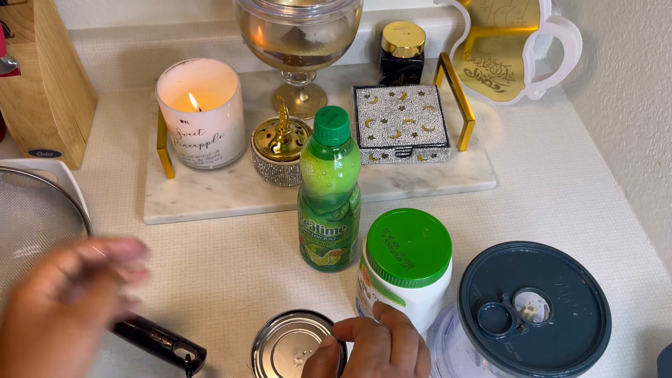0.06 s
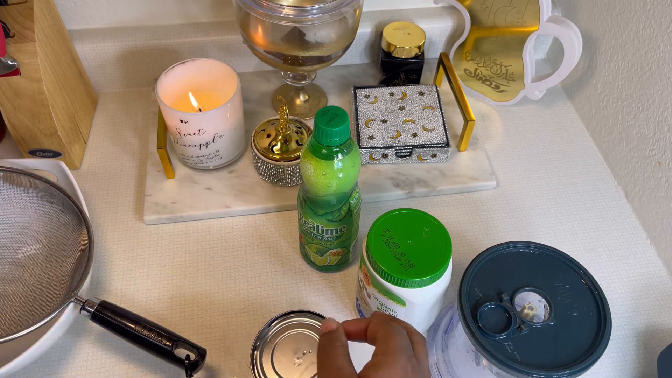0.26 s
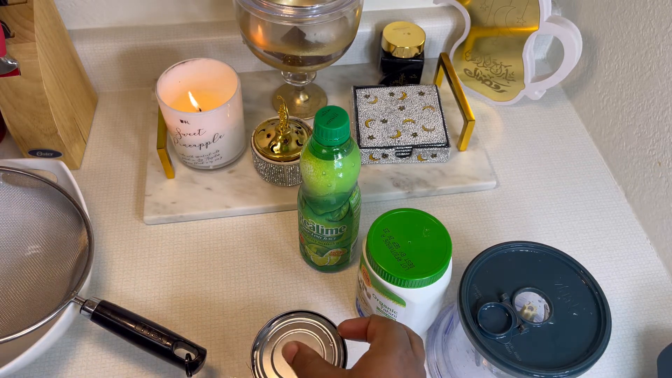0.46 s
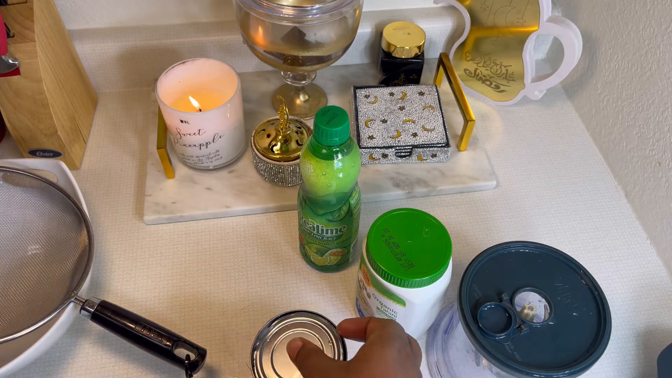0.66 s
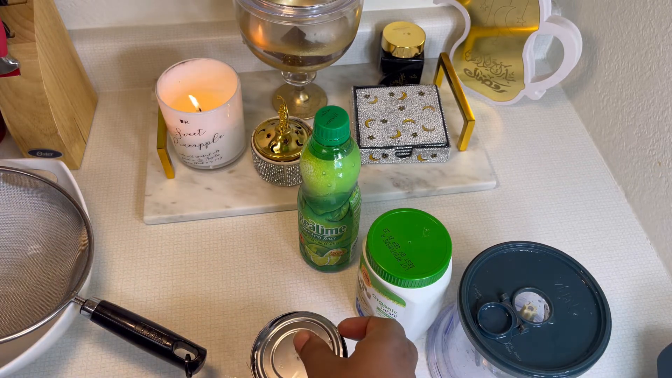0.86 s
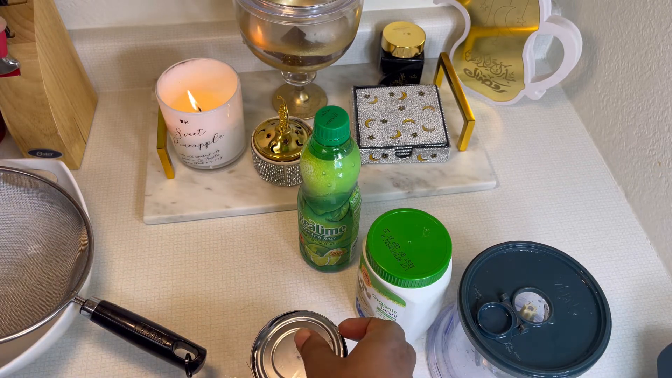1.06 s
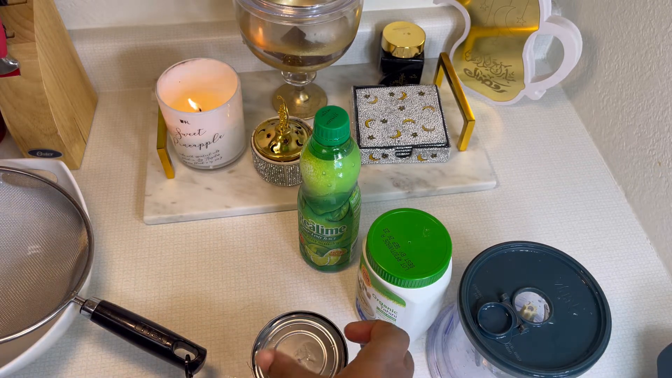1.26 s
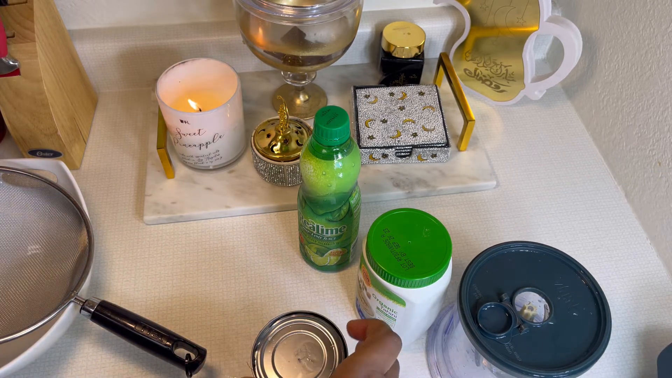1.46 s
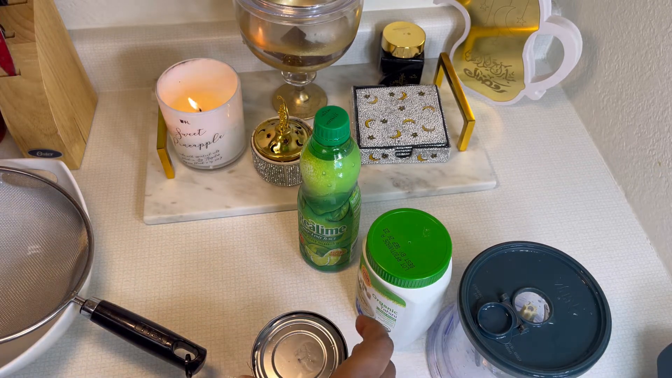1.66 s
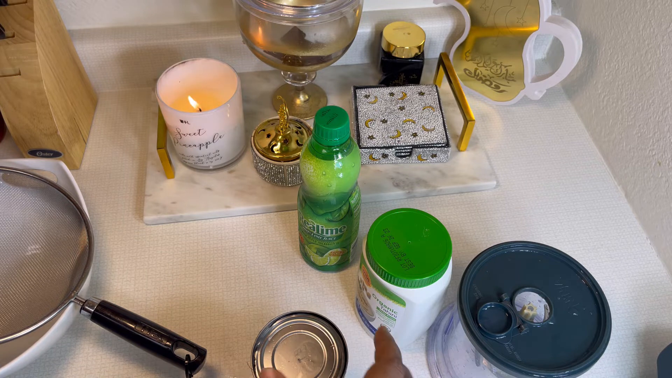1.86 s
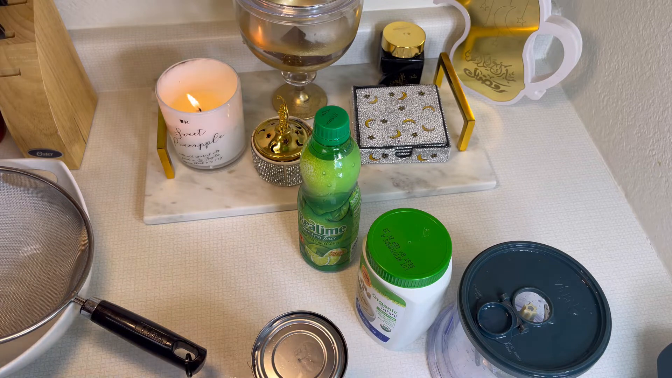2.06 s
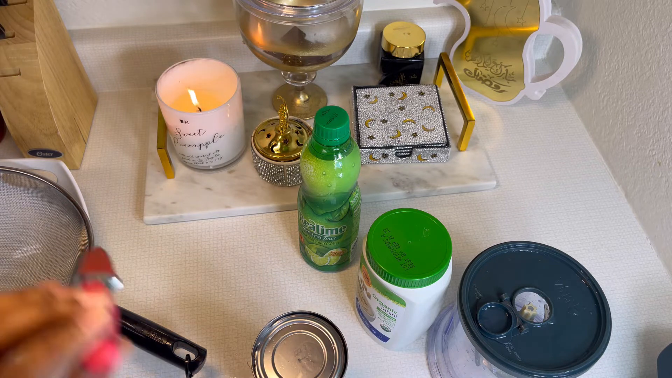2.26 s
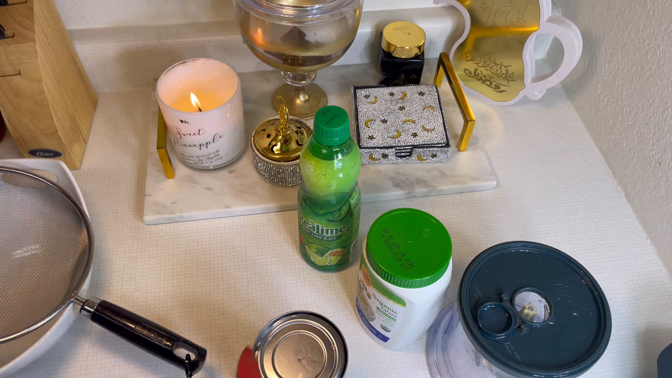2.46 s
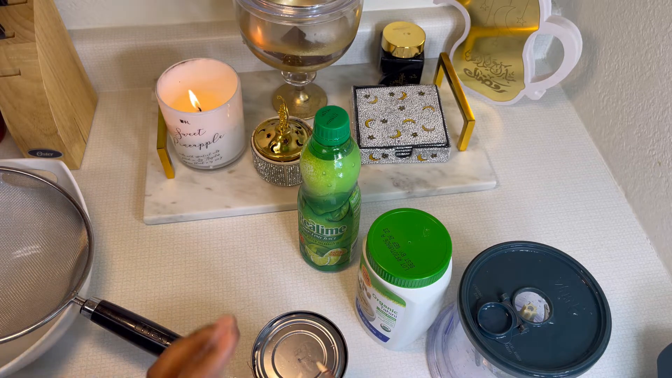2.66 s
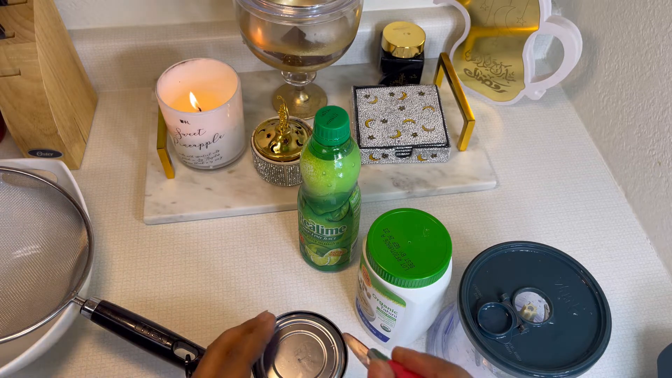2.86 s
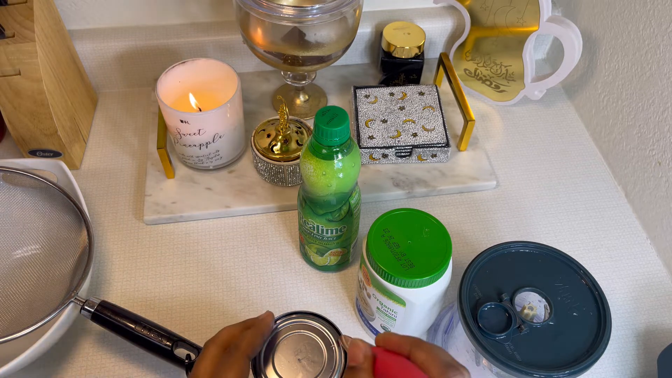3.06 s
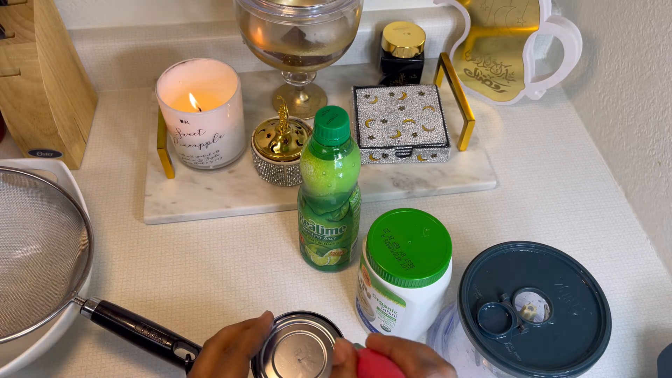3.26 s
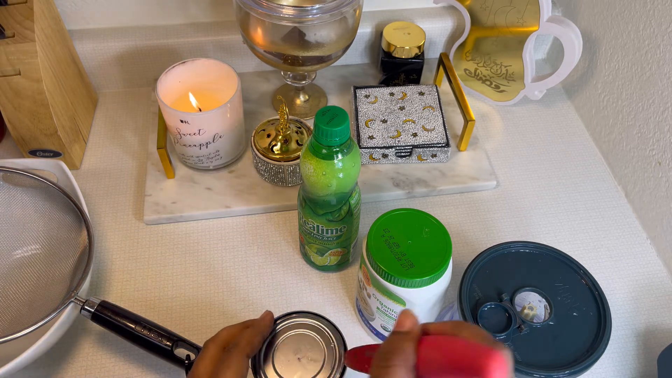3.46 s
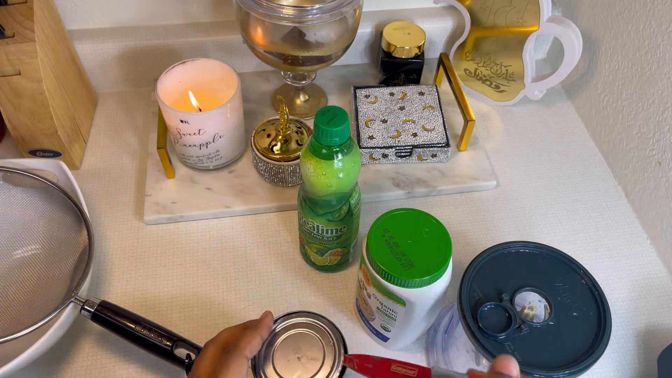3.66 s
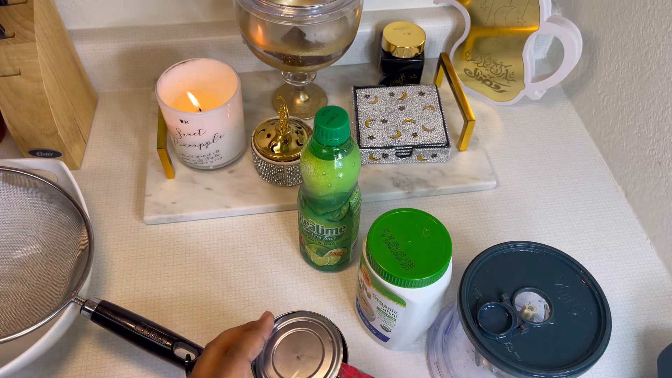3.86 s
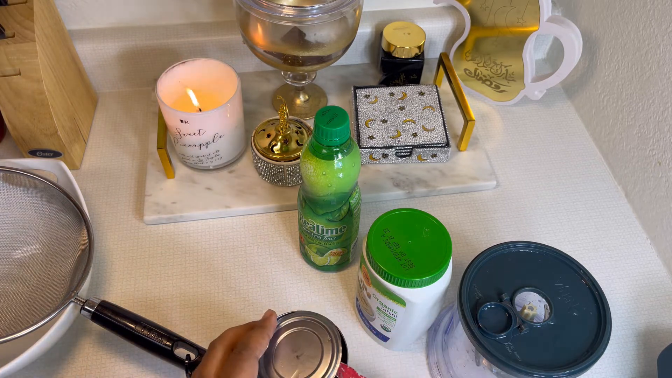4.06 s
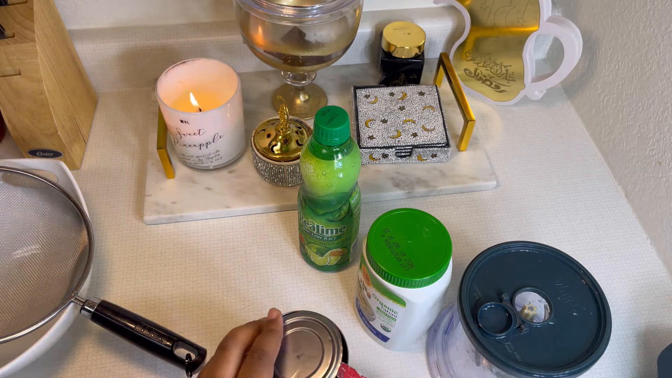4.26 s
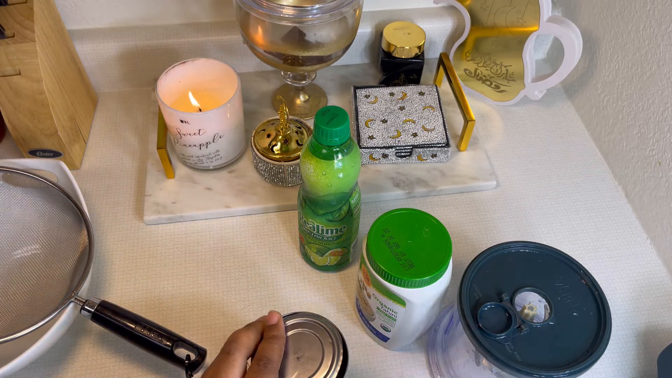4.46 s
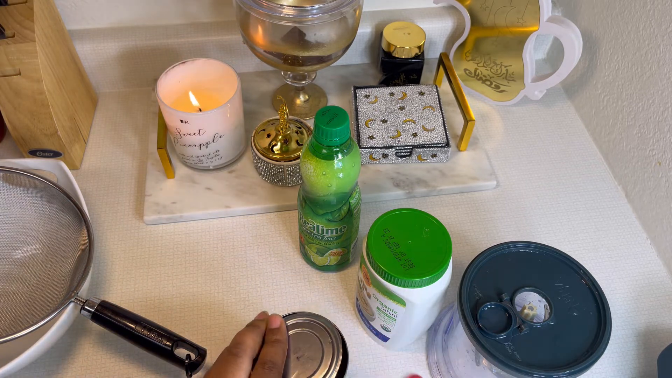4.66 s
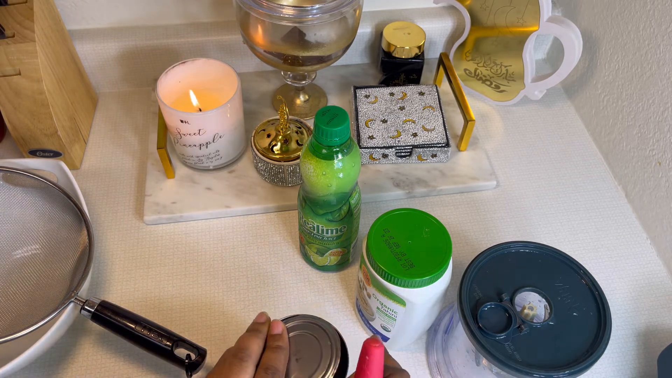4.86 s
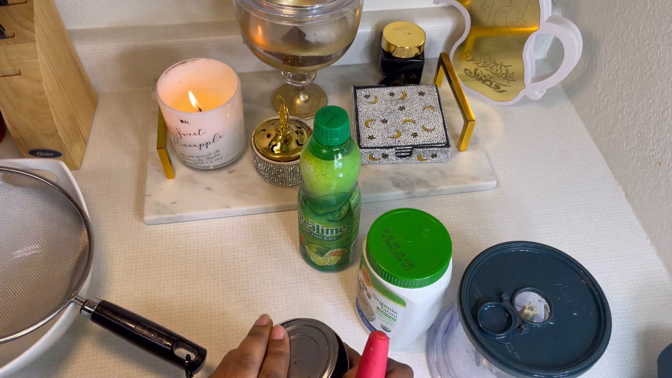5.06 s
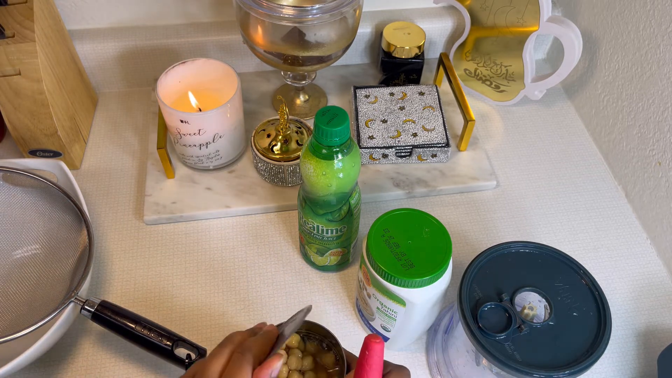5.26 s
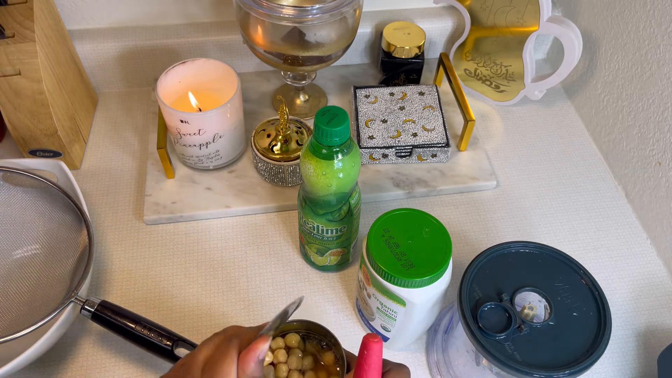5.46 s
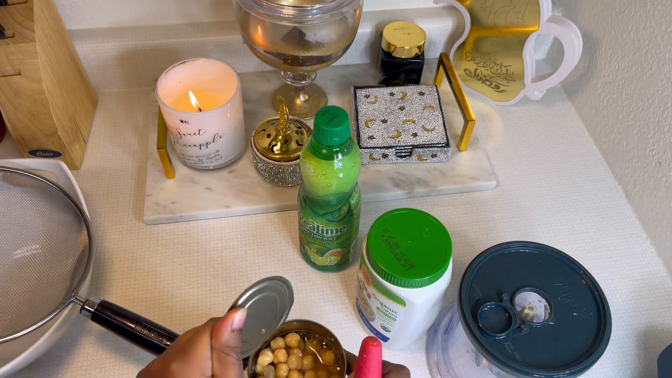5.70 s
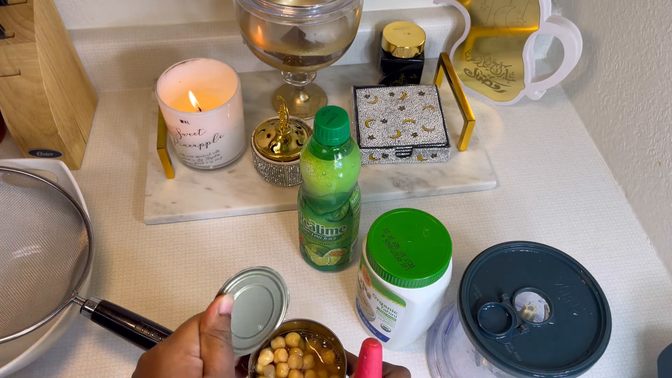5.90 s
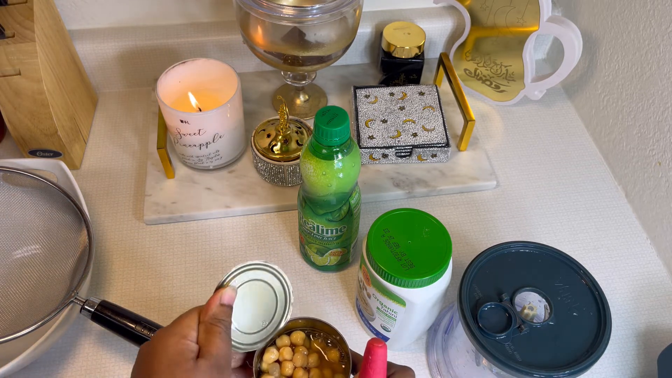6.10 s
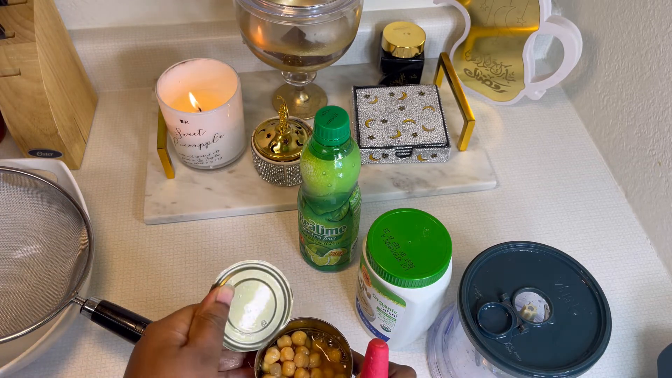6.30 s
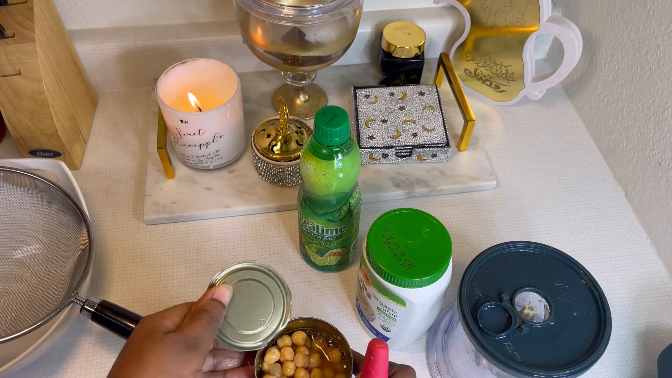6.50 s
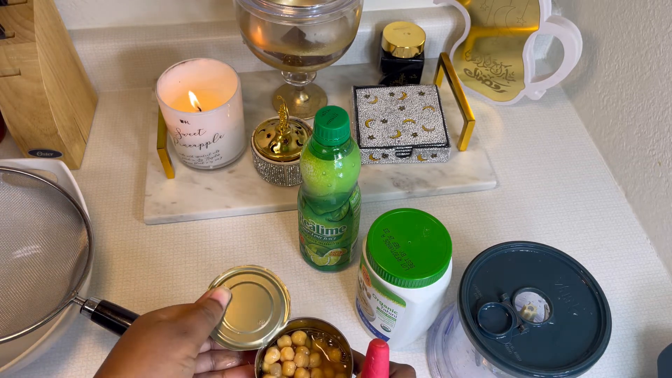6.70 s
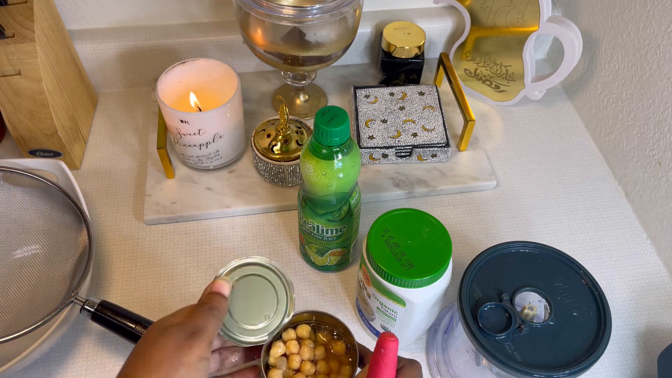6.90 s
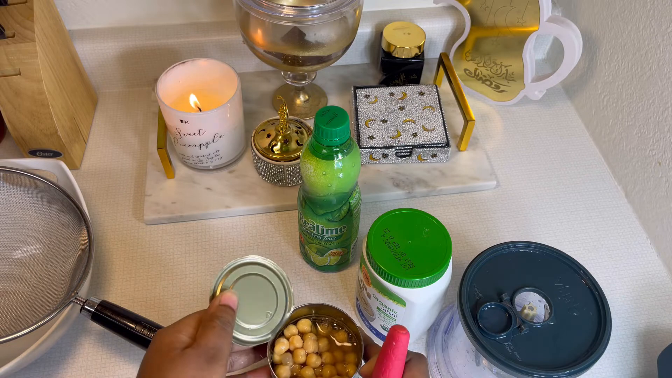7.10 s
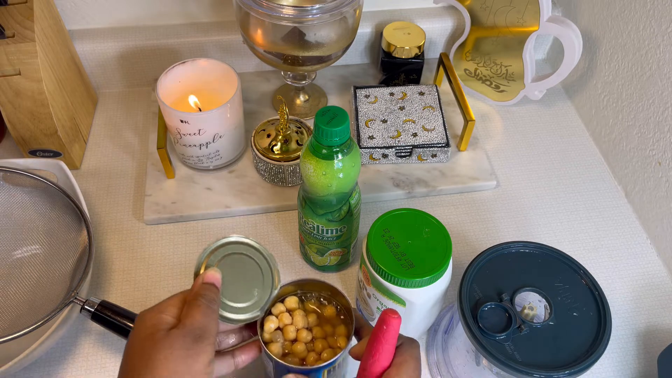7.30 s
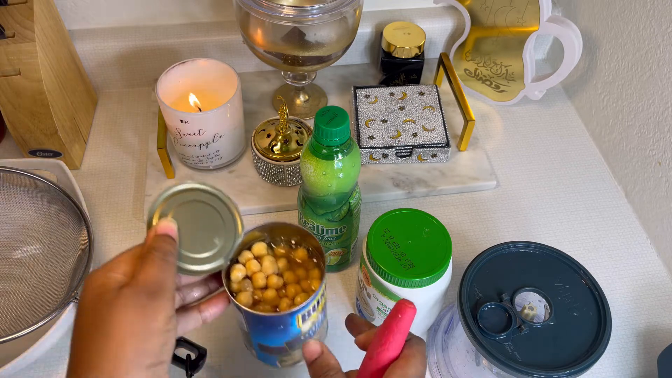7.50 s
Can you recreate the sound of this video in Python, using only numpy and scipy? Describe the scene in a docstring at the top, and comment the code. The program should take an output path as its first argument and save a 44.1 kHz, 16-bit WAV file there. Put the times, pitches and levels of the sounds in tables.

```python
"""Opening a metal can

A can is opened by hand on a kitchen counter, close by, over a fridge made of coloured noise and wavering tones.
Fingers flick the tab (ringing lid) and slide on the can (streams of tiny slips of noise).
An opener is picked up and clicks and scrapes at the rim: short noise bursts and dying tones.
The lid tears free with one loud snap that thumps the counter; later the can knocks down once more."""
import sys
import numpy as np
from scipy import signal
from scipy.fft import rfft, irfft, next_fast_len
from scipy.io import wavfile
from scipy.ndimage import uniform_filter1d

SR = 44100
rng = np.random.default_rng(int(sys.argv[2]) if len(sys.argv) > 2 else 0)


def wrap_up_sound(samples):
    """Save the sound to the file named by the first command line argument, as 16-bit audio."""
    columns = np.atleast_2d(samples).T
    # keep every value between -1 and 1, then stretch to whole-number steps
    tamed = np.clip(columns, -1, 1)
    steps = np.round(tamed * 32767).astype(np.int16)
    wavfile.write(sys.argv[1], SR, steps)


N = 332514

# how alike left and right are: [f/Hz, correlation from -1 to 1]
LIKENESS = [(60, 1), (200, 0.1), (500, 0.12), (1200, 0.073), (2500, -0.041), (6000, 0.59), (10000, -0.44)]
# colour of the hollow clack: [f/Hz, relative level/dB]
CLACK_COLOUR = [(300, -45), (650, -3), (950, 4), (1350, -2.5), (1800, -6), (2300, -6.5), (2900, -9.5),
                (4000, -19), (8000, -37)]
# colour of the bright tick: [f/Hz, relative level/dB]
TICK_COLOUR = [(1500, -14), (2500, 3), (4000, -0.5), (5500, -2.5), (7200, -5.5), (8700, 7), (11500, 1.5),
               (12400, -16.5), (15000, -53)]


def gain_of(db):
    """Turns decibels into an amplitude factor."""
    return 10 ** (np.asarray(db) / 20)


def evened(x):
    """Scales a sound to rms 1."""
    return x / np.sqrt(np.mean(x ** 2) + 1e-20)


def read(points, hz):
    """Reads a table between its points, along a log-frequency axis."""
    f, value = np.transpose(points)
    return np.interp(np.log(hz + 1), np.log(f + 1), value)


def add(mix, s, sound):
    """Mixes a stereo sound in at time s, in seconds."""
    part = mix[:, max(round(s * SR), 0):][:, :sound.shape[1]]
    part += sound[:, :part.shape[1]]


def drift(size):
    """Slow random wandering of rms 1: noise averaged twice over size samples."""
    once = uniform_filter1d(rng.standard_normal(N), size)
    return evened(uniform_filter1d(once, size))


def coloured(pair, spectrum, extra_db=lambda hz: 0):
    """Gives two unrelated noises a spectrum and the likeness of the two microphones; rms 1."""
    count = pair.shape[1]
    size = next_fast_len(count)
    hz = np.fft.rfftfreq(size, 1 / SR)
    a, b = rfft(pair, size)
    same = np.clip(read(LIKENESS, hz), -1, 1)
    mid = a * np.sqrt(1 + same)
    side = b * np.sqrt(1 - same)
    gain = gain_of(read(spectrum, hz) + extra_db(hz))
    stereo = np.array([mid + side, mid - side])
    return evened(irfft(stereo * gain, size)[:, :count])


def burst(t, spectrum, contact_s, colour=lambda hz: 0):
    """A dense cluster of tiny slips that is strongest after the contact time and then dies away."""
    u = t / max(contact_s, 0.0005)
    swell = u * np.exp(1 - u)
    return coloured(rng.standard_normal((2, len(t))), spectrum, colour) * swell


def ring(t, modes, scatter_db):
    """Dying tones; the struck spot varies their strength, and left and right may be out of step."""
    hz, db, t60 = np.transpose(modes)[:, :, None]
    strength, spread = rng.standard_normal((2, len(modes), 1))
    phase = 2 * np.pi * rng.random((len(modes), 1))
    # the less alike the two sides are at a pitch, the further apart their phases
    apart = np.sign(spread) * np.arccos(np.clip(read(LIKENESS, hz), -1, 1))
    fade = gain_of(db + scatter_db * strength) * np.exp(-np.log(1000) * t / t60)
    pair = [(fade * np.sin(2 * np.pi * hz * t + phase + lag)).sum(0) for lag in (0, apart)]
    return np.array(pair) / np.sqrt(np.sum(gain_of(db) ** 2) / 2)


def spot(pitch_hz, peak_db, width, ripple_db):
    """Each contact spot has one hollow main resonance and many chance ones; returns dB as a function of Hz."""
    grid = np.linspace(0, SR / 2, num=130)
    ripple = ripple_db * rng.standard_normal(len(grid))

    def colour(hz):
        """Chance ripple plus the main peak."""
        peak = peak_db / (1 + ((hz / pitch_hz - 1) / width) ** 2)
        return np.interp(hz, grid, ripple) + peak
    return colour


def fridge(air_db=-53, motor_db=-51, mains_db=-55, waver=0.8):
    """Fan noise and wavering tones; the motor runs just under the mains hum, so the two beat slowly."""
    # colour of the fan noise: [f/Hz, relative level/dB]
    air = [(20, -27.5), (40, -11.5), (60, -3.5), (100, 3), (180, -9.5), (250, -4.5), (420, -2), (550, -12),
           (700, -4.5), (850, -15.5), (1300, -18), (2100, -29.5), (3800, -35.5), (4200, -43.5),
           (7000, -46.5), (10800, -43.5), (13000, -55)]
    # steady fridge tones: [f/Hz, rms level before wavering/dB]
    tones = [(118, -61.5), (164, -68), (229, -61.5), (259, -64.5), (297, -74.5), (328, -74), (710, -70.5),
             (3750, -90)]
    t = np.arange(N) / SR
    mains_hz, beat_s, lull_s = 60, 1.095, 0.58  # a lull falls at lull_s and after every beat
    turns = mains_hz * t
    hum = gain_of(motor_db) * np.sin(2 * np.pi * (turns - (t - lull_s) / beat_s))
    hum -= gain_of(mains_db) * np.sin(2 * np.pi * turns)
    for hz, db in tones:
        loudness = gain_of(db) * (1 + 0.39 * drift(size=4000))
        hum += loudness * np.sin(2 * np.pi * hz * t + waver * drift(size=3000))
    fan = gain_of(air_db) * coloured(rng.standard_normal((2, N)), air)
    return np.sqrt(2) * hum + fan  # a sine of rms 1 peaks at sqrt(2)


def echoes(build_s=0.0045):
    """Dense reflections from counter, walls and jars, each band dying at its own speed; left energy 1."""
    # how long the kitchen echoes: [f/Hz, time to fall by 60 dB/s]
    echo_times = [(100, 0.45), (500, 0.38), (2500, 0.39), (6000, 0.4), (11500, 0.21), (13000, 0.09)]
    hz, t, z = signal.stft(rng.standard_normal((2, SR)), SR, nperseg=256)
    fade = np.exp(-np.log(1000) * t / read(echo_times, hz)[:, None])
    tail = signal.istft(z * fade, SR, nperseg=256)[1]
    tail *= 1 - np.exp(-(np.arange(tail.shape[1]) / SR / build_s) ** 2)
    return tail / np.linalg.norm(tail[0])


def kitchen(x, wet_db):
    """A sound together with its reflections."""
    return x + gain_of(wet_db) * signal.fftconvolve(x, echoes(), axes=1)[:, :N]


def thuds(swell_cycles=1.4, level_db=-3):
    """The counter answers a push slowly: each mode takes a cycle or two to build, so the deepest come last."""
    # low modes of can and counter: [f/Hz, relative level/dB, time to fall by 60 dB/s]
    counter_modes = [(54.26, -1, .28), (96, 1.5, 0.16), (183, 5, 0.055), (215, 4, 0.079), (270.5, -8.5, .3),
                     (378, 0, 0.059), (451.7, -4.5, .11)]
    # the can is pushed against the counter: [t/s, relative level/dB]
    pushes = [(0.832, -48), (1.214, -36.5), (1.5, -45), (5.2, -14.5), (6.881, -32), (7.038, -39.5)]
    out, t = np.zeros((2, N)), np.arange(SR // 2) / SR
    hz, db, t60 = np.transpose(counter_modes)[:, :, None]
    swell = 1 - np.exp(-(hz * t / swell_cycles) ** 2)
    shape = swell * np.exp(-np.log(1000) * t / t60)
    thud = (gain_of(db + level_db) * shape * np.sin(2 * np.pi * hz * t)).sum(0)
    for s, push_db in pushes:
        add(out, s, gain_of(push_db) * np.array([thud, thud]))
    return out


def slides(hiss_db=-2, grains_per_s=5000, grit_per_s=110, grit_db=8, scuff_db=1.7, rub_hz=650):
    """Friction: a stream of tiny slips with a few hard catches, in scuffs as the pressure varies."""
    # strokes over metal and counter: [start t/s, rise/s, length/s, rasp level/dB, relative hiss level/dB]
    strokes = [(1.482, 0.065, 0.18, -57.5, -51.5), (1.668, 0.02, 0.048, -57, -52.5),
               (2.111, 0.0067, 0.045, -46.5, -71), (2.216, 0.042, 0.15, -47, -52.5),
               (2.359, 0.04, 0.213, -52, -62), (2.568, .035, 0.28, -54, -58.5),
               (2.879, 0.049, 0.14, -56.5, -100), (4.807, 0.064, .11, -64.5, -69),
               (6.809, 0.059, 0.098, -60.5, -61)]
    # colour of the lower, rough part: [f/Hz, relative level/dB]
    rasp_colour = [(200, -27), (450, -0.5), (650, 6), (850, 3), (1300, 3.5), (1750, 1.5), (2400, -1),
                   (4000, -10.5), (6500, -21), (10000, -35)]
    # colour of the high, airy part: [f/Hz, relative level/dB]
    hiss_colour = [(2000, -4), (5000, 0.5), (7300, 4), (9000, 15.5), (11700, 13), (12600, -31),
                   (15000, -53)]
    # a stroke slows after its rise, so the hiss fades faster than the rasp; then the hand lets go
    rasp_db_per_s, hiss_db_per_s, release_s = -23.5, -54, 0.01
    out = np.zeros((2, N))
    for start, rise, length, rasp, hiss in strokes:
        t = np.arange(0, length + release_s, 1 / SR)
        let_go = np.clip(1 - (t - length) / release_s, 0, 1)
        press = np.clip(t / rise, 0, 1) * let_go
        slowing_s = np.maximum(t - rise, 0)
        slip, catch = rng.random((2, SR))[:, :len(t)] * SR
        size = (slip < grains_per_s) + gain_of(grit_db) * (catch < grit_per_s)
        slips = size * rng.standard_normal((2, SR))[:, :len(t)]
        colour = spot(rub_hz, peak_db=9.5, width=0.048, ripple_db=3.5)
        parts = ((rasp, rasp_db_per_s, rasp_colour), (hiss_db + hiss, hiss_db_per_s, hiss_colour))
        for level_db, fade, spectrum in parts:
            scuffs = scuff_db * drift(size=500)[:len(t)]
            force = press * gain_of(level_db + fade * slowing_s + scuffs)
            add(out, start, force * coloured(slips, spectrum, colour))
    return out


def ticks(level_db=-3, contact_s=0.0051, body_db=-10):
    """Bright ticks with a trace of hollow clack, some alone and some sounding together with a knock."""
    # bright ticks: [t/s, relative level/dB]
    tick_times = [(0.203, -65), (1.825, -61), (3.058, -46.5), (3.105, -47.5), (3.478, -47), (4.288, -49),
                  (4.737, -59), (4.997, -56.5), (7.034, -56)]
    out, t = np.zeros((2, N)), np.arange(SR // 8) / SR
    for s, db in tick_times:
        sound = burst(t, TICK_COLOUR, contact_s)
        sound += gain_of(body_db) * burst(t, CLACK_COLOUR, contact_s)
        add(out, s, gain_of(level_db + db) * sound)
    return out


def clack(t, contact_s, pitch_hz, tick_db, push_db, body_db=-5, note_db=-2, swell=0.29):
    """One contact: a hollow clack with a short note, a bright tick and a low push."""
    # colour of the low push: [f/Hz, relative level/dB]
    push_colour = [(60, -23), (150, -7), (300, 2.5), (600, 4), (900, -29), (2000, -69.5)]
    # the short note, with the steel held in the hand:
    # [multiple of the clack pitch, relative level/dB, time to fall by 60 dB/s]
    note_modes = [(1.001, 3.5, 0.073), (1.119, -7, 0.051), (1.459, -6.5, 0.048), (2.102, -10, 0.046)]
    # spots pitched above stiff_hz are too stiff to hold a note
    stiff_hz, note_db_per_octave = 1640, -17
    colour = spot(pitch_hz, peak_db=14.0, width=0.23, ripple_db=6.0)
    note = [(pitch_hz * multiple, db, t60) for multiple, db, t60 in note_modes]
    build = 1 - np.exp(-t / (swell * contact_s))  # the note grows while the contact lasts
    damping_db = note_db_per_octave * max(np.log2(pitch_hz / stiff_hz), 0)
    sound = gain_of(body_db) * burst(t, CLACK_COLOUR, contact_s, colour)
    sound += gain_of(note_db + damping_db) * ring(t, note, scatter_db=2.5) * build
    sound += gain_of(tick_db) * burst(t, TICK_COLOUR, 0.91 * contact_s, colour)
    return sound + gain_of(push_db) * burst(t, push_colour, 1.57 * contact_s, colour)


def landing(contact_s=0.0039):
    """The full can meets the counter: a dull clack with a low push, and no lid left to ring."""
    # the open can lands and rocks onto its far edge: [t/s, relative level/dB, clack pitch f/Hz]
    touches = [(6.876, -33.5, 1112), (6.88, -36.5, 900)]
    out, t = np.zeros((2, N)), np.arange(SR // 3) / SR
    for s, db, pitch_hz in touches:
        add(out, s, gain_of(db) * clack(t, contact_s, pitch_hz, tick_db=-24, push_db=-4))
    return out


def knocks(treble_db=-7, bass_db=-8, ring_db=-3, sustain=1.2):
    """Handling knocks: the opener is picked up with a clatter, then knocks and catches on the can."""
    # handling knocks: [t/s, relative level/dB, contact time/s, clack pitch f/Hz]
    contacts = [(.779, -52.5, 0.0085, 1940), (1.293, -42.5, 0.0041, 2140), (1.421, -47, 0.0036, 1785),
                (1.973, -47.5, 0.017, 2250), (2.082, -30.5, 0.0081, 2286), (2.22, -41, 0.008, 2370),
                (3.057, -37, 0.013, 1300), (3.258, -46, 0.019, 1100), (3.304, -45, 0.0074, 1340),
                (3.342, -43, 0.013, 930), (3.373, -39, 0.0095, 940), (3.437, -39, 0.011, 1330),
                (3.478, -41.5, 0.004, 1435), (3.597, -34.5, .013, 1610), (3.622, -43.5, 0.0082, 810),
                (3.666, -47.5, 0.017, 1610), (3.708, -32.5, .012, 1496), (3.748, -34, .0045, 1386),
                (3.783, -32.5, 0.0032, 1263), (3.848, -44, .011, 1344), (4.303, -37.5, 0.0046, 1287)]
    # resonances of the metal held in the hand: [f/Hz, width before sustain/Hz, relative level/dB]
    gripped = [(409, 32, -3), (860, 36, -6.5), (1320, 250, 8), (1713, 56, -18), (1844, 38, 2),
               (2240, 35, -3), (2476, 37, -6), (2800, 51, -21), (3430, 63, -11), (4020, 43, -14),
               (4900, 29, -20), (5130, 120, -18), (5930, 87, -25), (6070, 21, -16)]
    # tick and push grow softer with each doubling of the contact time
    abrupt_s, tick_db_per_doubling, push_db_per_doubling = 0.0032, -6.5, -3
    # a stiffer spot, pitched higher than the rim, ticks more brightly
    rim_hz, tick_db_per_octave = 1370, 7
    out, t = np.zeros((2, N)), np.arange(SR // 3) / SR
    # a narrow resonance rings for longer
    held = [(hz, db, sustain * np.log(1000) / (np.pi * width)) for hz, width, db in gripped]
    for s, db, contact_s, pitch_hz in contacts:
        slowness = np.log2(contact_s / abrupt_s)
        stiffness = np.log2(pitch_hz / rim_hz)
        tick_db = treble_db + tick_db_per_doubling * slowness + tick_db_per_octave * stiffness
        push_db = bass_db + push_db_per_doubling * slowness
        sound = clack(t, contact_s, pitch_hz, tick_db, push_db)
        build = 1 - np.exp(-t / contact_s)
        sound += gain_of(ring_db) * ring(t, held, scatter_db=2.0) * build
        add(out, s, gain_of(db) * sound)
    return out


def flicks(ring_db=-3, tick_s=0.00092, clank_db=-6, clank_hz=1320):
    """The tab strikes the lid with a bright tick and a clank, and the lid rings like a small drum."""
    # the tab flicks back on the lid, damped by a finger:
    # [t/s, relative level/dB, tick level next to that/dB, ring length as a factor]
    tab_hits = [(1.181, -32, -29, 0.4), (1.213, -25, -16.5, 0.87)]
    # modes of the closed lid: [f/Hz, relative level/dB, undamped time to fall by 60 dB/s]
    lid = [(965, 0, 0.36), (1307, 4, 0.098), (1450, -12, 0.25), (1656, -12, 0.23), (1710, -3.5, 0.17),
           (2460, -14.5, 0.82), (2560, -10.5, 0.18), (2830, -5, 0.16), (2930, -8.5, 0.1),
           (3010, -16.5, 0.28), (3770, -22, 0.33), (4130, -21, .15), (4540, -24, 0.2), (6067, -25, 0.41),
           (7810, -30, 0.59), (8320, -21.5, 0.75), (9000, -18, 0.25), (11100, -11, 0.073)]
    out, t = np.zeros((2, N)), np.arange(SR // 2) / SR
    for s, db, tick_db, length in tab_hits:
        modes = [(hz, level, t60 * length) for hz, level, t60 in lid]
        build = 1 - np.exp(-t / tick_s)
        clank_colour = spot(clank_hz, peak_db=8, width=0.16, ripple_db=3)
        sound = gain_of(ring_db) * ring(t, modes, scatter_db=2.5) * build
        sound += gain_of(tick_db) * burst(t, TICK_COLOUR, 2 * tick_s)
        sound += gain_of(clank_db) * burst(t, CLACK_COLOUR, 2 * tick_s, clank_colour)
        add(out, s, gain_of(db) * sound)
    return out


def snap(ring_db=-8.0, contact_s=0.0024, rise_s=0.001, wash_db=-40.5, ring_wet_db=-22):
    """The lid breaks free in a double crack that fills the room; lid and can ring briefly, close by."""
    # the last bridges of metal break in quick succession: [t/s, level/dB]
    cracks = [(5.196, -13), (5.2012, -17)]
    # colour of a crack: [f/Hz, relative level/dB]
    crack_colour = [(180, -18), (550, -0.5), (800, -12), (1300, -4.5), (2300, -6.5), (2900, -10),
                    (3400, -6.5), (4000, -14), (5500, -16), (7400, -21), (8600, -11.5), (11300, -9),
                    (12300, -21), (15500, -57)]
    # modes of the freed lid and the open can: [f/Hz, relative level/dB, time to fall by 60 dB/s]
    open_can = [(562, -9, 0.13), (973, -3, 0.086), (1277, 2, 0.056), (1556, -2.5, .045), (1659, -6.5, 0.13),
                (2070, 2, 0.097), (2230, 0, 0.087), (2390, -1.5, 0.065), (2306, -1, 0.077), (2613, -9, 0.1),
                (2884, -11.5, 0.078), (3170, -12, .05), (3320, -7, 0.094), (4330, -21, 0.09)]
    out, t = np.zeros((2, N)), np.arange(SR // 2) / SR
    start = cracks[0][0]
    build = 1 - np.exp(-t / rise_s)
    add(out, start, gain_of(ring_db) * ring(t, open_can, scatter_db=1.0) * build)
    out = kitchen(out, wet_db=ring_wet_db)
    for s, db in cracks:
        add(out, s, gain_of(db) * burst(t, crack_colour, contact_s))
    # the crack leaves the can in all directions, so the room returns its smooth average colour
    wash = coloured(echoes(), crack_colour)[:, :len(t)]
    add(out, start, gain_of(wash_db) * wash)
    return out


def scene():
    """All the handling sounds in the kitchen, over the fridge."""
    handling = slides() + ticks() + landing() + knocks() + flicks()
    return fridge() + kitchen(thuds(), wet_db=-11.0) + kitchen(handling, wet_db=-9.0) + snap()


def record(dry):
    """The right microphone is the more sensitive at most pitches; peaks are clipped, then the top is cut."""
    # left minus right: [f/Hz, level difference/dB]
    tilt = [(60, -1.5), (160, -6.5), (300, -2.5), (3000, -2.5), (5500, -9), (8500, -1.5), (12000, 0.5)]
    edge_hz = 15600
    size = next_fast_len(N + SR // 10)
    tilt_db = read(tilt, np.fft.rfftfreq(size, 1 / SR))
    heard = irfft(rfft(dry, size) * gain_of([tilt_db / 2, -tilt_db / 2]), size)[:, :N]
    limited = np.clip(heard, -0.9, 0.9)
    low_pass = signal.firwin(511, edge_hz, window=("kaiser", 9), fs=SR)
    return signal.oaconvolve(limited, low_pass[None], "same", axes=1)


dry = scene()
out = record(dry)
wrap_up_sound(out)
```